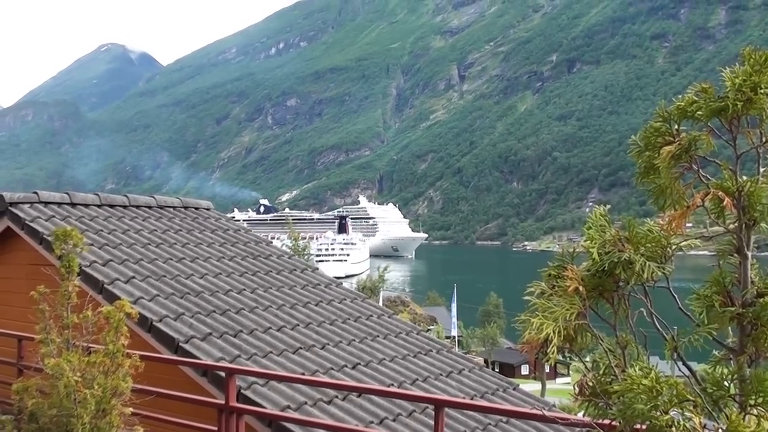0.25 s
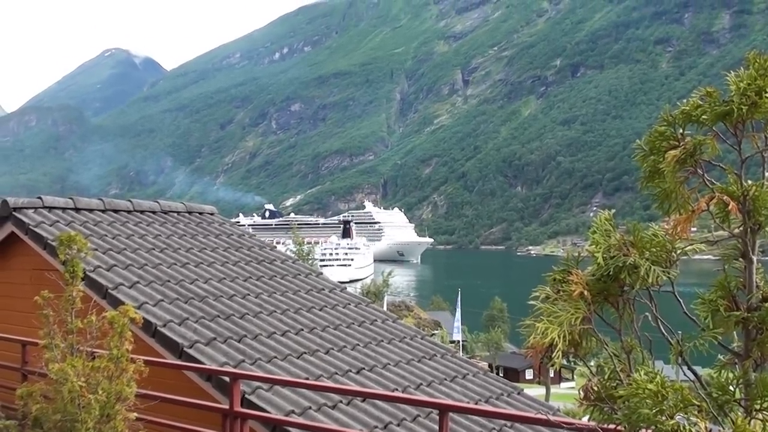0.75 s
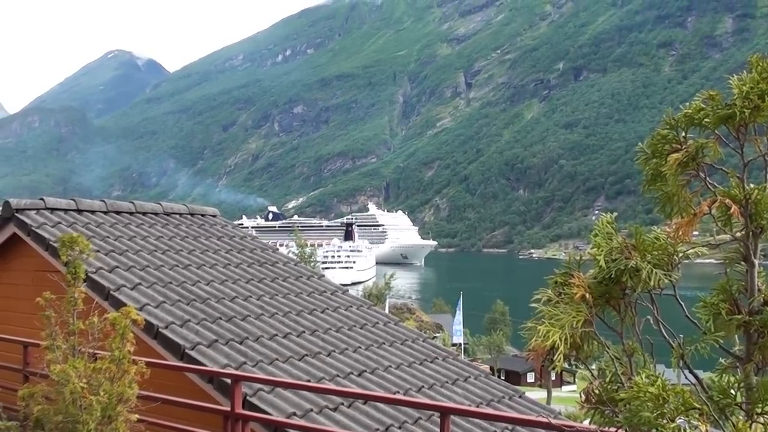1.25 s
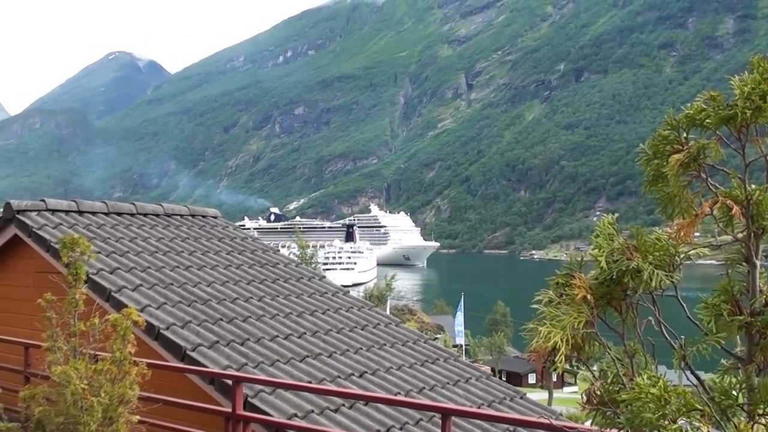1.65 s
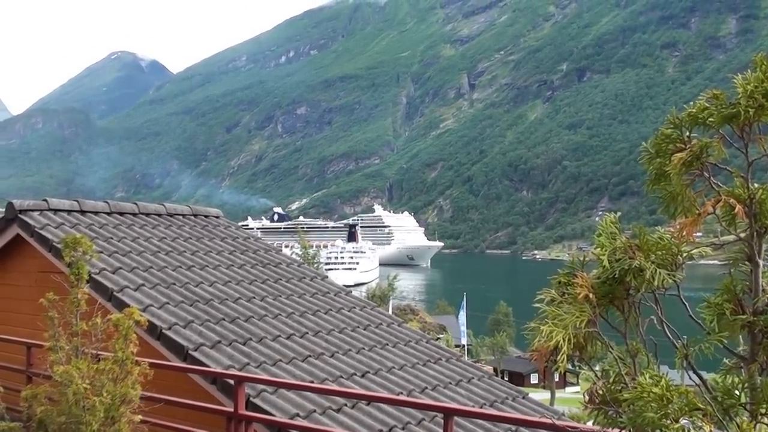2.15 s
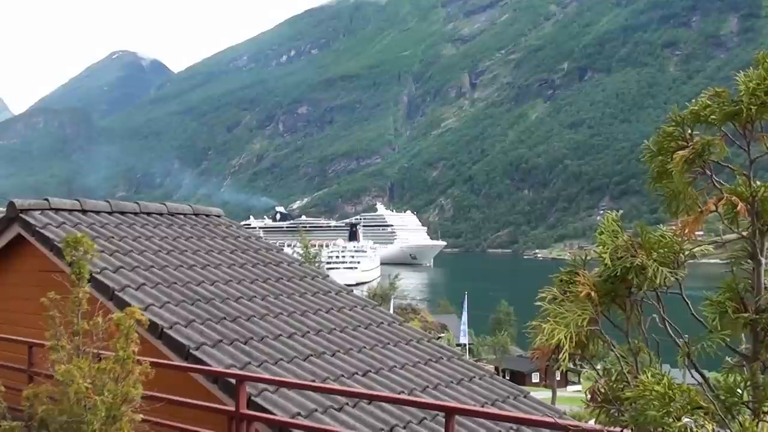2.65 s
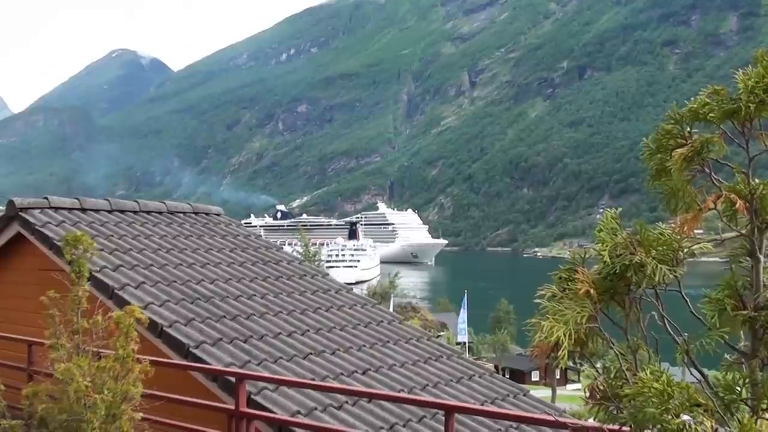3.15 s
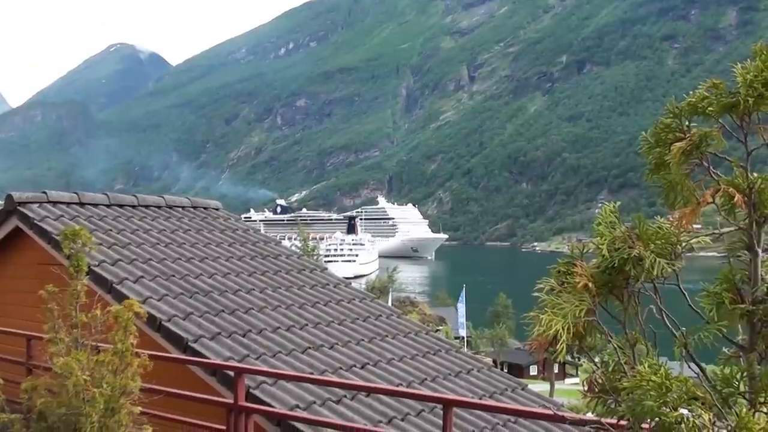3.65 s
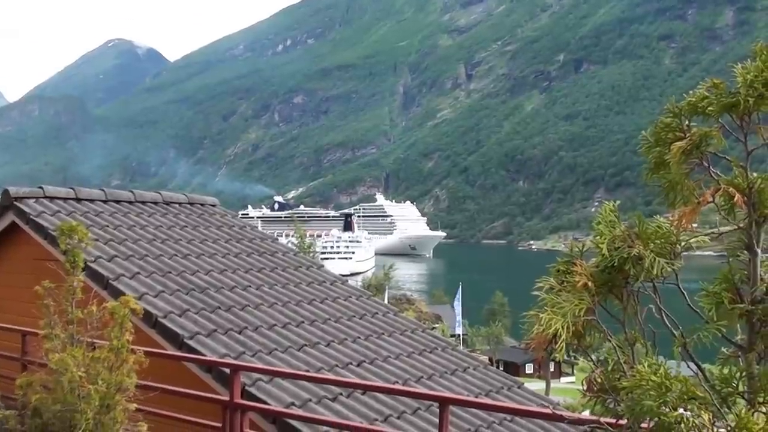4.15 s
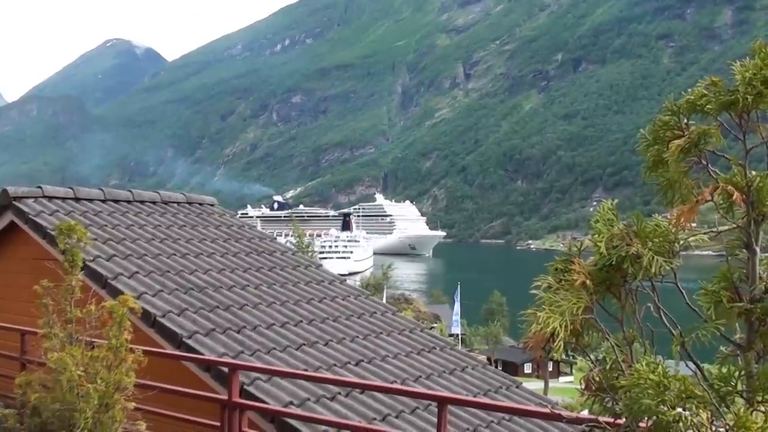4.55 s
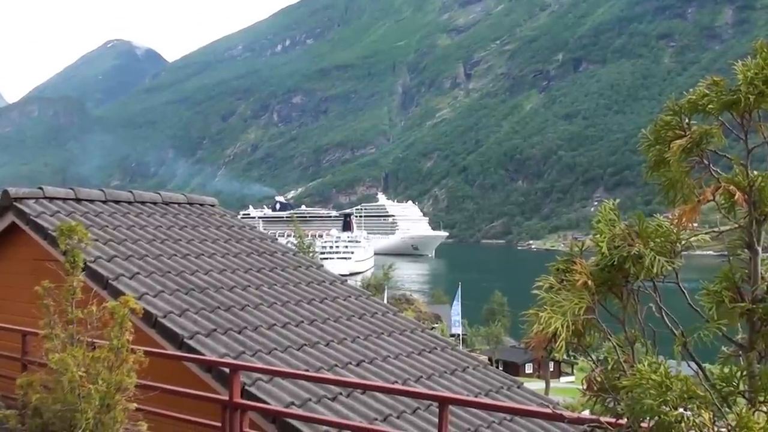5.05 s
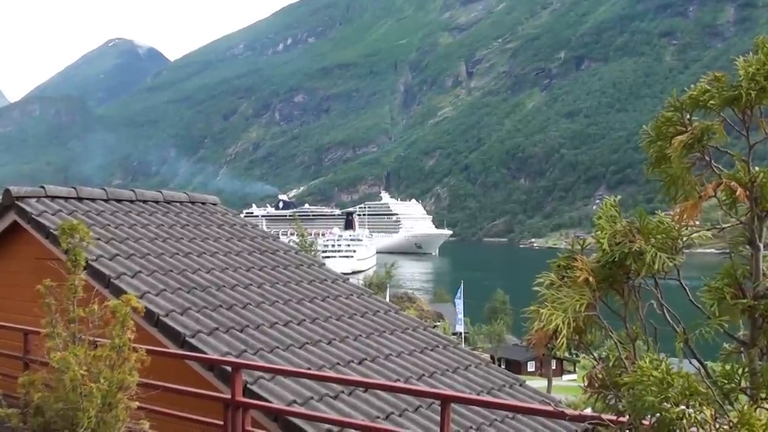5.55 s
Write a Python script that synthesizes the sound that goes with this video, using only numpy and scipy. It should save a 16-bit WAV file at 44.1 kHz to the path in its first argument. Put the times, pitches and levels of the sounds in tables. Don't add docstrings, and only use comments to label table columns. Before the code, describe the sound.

Outdoors above a fjord harbour, a powerful low ship horn drones steadily, its brassy overtones shimmering and fading with the moving air. A fainter horn of nearly the same pitch makes it throb. Just after five seconds the blast drops away with a short downward sag, leaving softer echoes from the slopes and the distant horn. Low generator hum, small bright ticks and camera microphone hiss lie underneath.

```python
import sys
import numpy as np
from scipy import signal
from scipy.fft import rfft, irfft
from scipy.io import wavfile

SR = 44100
rng = np.random.default_rng(int(sys.argv[2]) if len(sys.argv) > 2 else 0)


def generate_wav(sig):
    pcm = np.round(np.clip(np.atleast_2d(sig).T, -1, 1) * 32767).astype(np.int16)
    wavfile.write(sys.argv[1], SR, pcm)


def gain_from_db(level_db):
    decades = np.asarray(level_db, float) / 20
    return 10 ** decades


N = 255780
SHUT_S = 5.105


def in_time(rows):
    s, *columns = np.transpose(rows)
    return [np.interp(np.arange(N) / SR, s, column) for column in columns]


def at_hz(points, hz):
    point_hz, value = np.transpose(points)
    return np.interp(np.log(hz), np.log(point_hz), value)


def since(s):
    return np.maximum(np.arange(N) / SR - s, 0)


def drift(rate_hz):
    r = np.exp(-80 * np.pi * rate_hz / SR)
    noise = rng.standard_normal(N // 40 + 4002)
    slow = signal.lfilter([1], [1, -2 * r, r * r], noise)[4000:]
    slow = slow / np.sqrt(np.mean(slow ** 2))
    return np.interp(np.arange(N) / 40, np.arange(len(slow)), slow)


def partial(cycles, level_db, pan_db=0., lead_rad=0.):
    side = np.array([[.5], [-.5]])
    return np.sqrt(2) * gain_from_db(level_db + pan_db * side) * np.cos(2 * np.pi * cycles + lead_rad * side)


def shimmer(multiple, slow_db, fast_db, wander_cycles):
    depth = np.sqrt(min(multiple, 12) / 6)
    fade_db = depth * (slow_db * drift(1.2) + fast_db * drift(6.2))
    shift = depth * wander_cycles * (drift(0.73) + 0.27 * drift(13.0))
    return fade_db, shift


# f/Hz, density/(dB per Hz)
HARBOUR = [(20, -75), (50, -81), (80, -68), (200, -63.5), (320, -67), (470, -67), (640, -66.5), (900, -73),
           (1500, -76.5), (2300, -83.5), (3500, -92), (5500, -99), (9000, -108), (15000, -116)]
# f/Hz, width/Hz, level/dB
HARBOUR_PEAKS = [(553.5, 19, 10.5), (738, 19, 3.5), (1004, 18, 5)]
# f/Hz, likeness/1
LIKENESS = [(60, 0.61), (300, 0.51), (1400, .9), (3000, 0.89), (4500, .56), (7000, 0.9), (10000, 0.9)]
# f/Hz, rms level/dB
GENERATOR = [(62, -61.5), (68, -61), (75, -59), (86.1, -56), (112.2, -47.5), (162.1, -58.5), (199.7, -54),
             (246.6, -49.5)]


def harbour():
    hz = np.maximum(np.fft.rfftfreq(N, 1 / SR), 10)
    shape_db = at_hz(HARBOUR, hz)
    for centre_hz, width_hz, db in HARBOUR_PEAKS:
        shape_db = shape_db + db / (1 + (2 * (hz - centre_hz) / width_hz) ** 2)
    alike = np.clip(at_hz(LIKENESS, hz), 0, 1)
    mid, side = rfft(rng.standard_normal((2, N))) * gain_from_db(shape_db) * np.sqrt(SR / 2)
    pair = np.sqrt((1 + alike) / 2) * mid + np.sqrt((1 - alike) / 2) * side * [[1], [-1]]
    octave = np.log2(hz / 40)
    noise = 0
    for k in range(-2, 10):
        band = irfft(pair * np.clip(1 - abs(octave - k), 0, 1), N)
        noise = noise + band * gain_from_db(1.3 * drift(1.4) + .9 * drift(7.))
    lines = 0
    for line_hz, db in GENERATOR:
        cycles = line_hz * np.arange(N) / SR + 0.08 * drift(0.39)
        lines = lines + partial(cycles, db + 0.8 * drift(4.4), 5.3)
    return gain_from_db(.7) * (noise * gain_from_db([[.6], [-.6]]) + lines)


# t/s, level/dB, f/Hz, rise/s, t60/s
TICKS = [
    (.524, -57, 4800, .001, 0.021),
    (.525, -50, 7200, .001, 0.013),
    (3.179, -64.5, 7500, .08, .25),
    (5.26, -62, 5600, .02, .1),
    (.077, -57, 5600, .001, .02),
    (.64, -55, 5200, .002, 0.028),
    (1.39, -61.5, 6000, .002, .03),
    (5.412, -48, 7300, .001, 0.018),
    (5.412, -55, 5000, .001, .015),
]


def ticks():
    out, t = np.zeros(N), np.arange(SR // 4) / SR
    for s, level_db, hz, rise_s, t60_s in TICKS:
        band = signal.butter(2, [hz * 0.81, hz * 1.12], "band", fs=SR, output="sos")
        fall_db = 60 * np.maximum(t - rise_s, 0) / t60_s
        shape = np.minimum(t / rise_s, 1) * gain_from_db(level_db + 12.5 - fall_db)
        start = round(s * SR)
        out[start:start + len(t)] += signal.sosfilt(band, rng.standard_normal(len(t))) * shape
    return out


def arrival(s, rise_s, fade_db_per_s):
    return np.minimum(since(s) / rise_s, 1) ** 2 * gain_from_db(-fade_db_per_s * since(s + rise_s))


# t/s, rise/s, fade/(dB per s), fundamental level/dB, octave level/dB
SHORES = [
    (5.12, .1, 58, -29, -28.5),
    (5.419, 0.079, 8.5, -34.5, -28),
]
# multiple/1, level/dB
ECHO_UPPER = [(3, 4.5), (4, -14.5), (5, -14), (6, -11), (7, -17), (8, -18.5), (9, -25), (10, -26),
              (11, -23.5)]


def echo():
    cycles = 134.4 * (np.arange(N) / SR - 5.6) - .2
    out = arrival(5.48, 0.18, 14.5) * partial(cycles, -27.5, -.3)
    for s, rise_s, fade_db_per_s, first_db, second_db in SHORES:
        pair = partial(cycles, first_db, -.3) + partial(2 * cycles + .21, second_db, -.3)
        out = out + arrival(s, rise_s, fade_db_per_s) * pair
    bright = arrival(5.03, 0.035, 18)
    for k, level_db in ECHO_UPPER:
        fade_db, shift = shimmer(k, 1.2, 3.2, .16)
        out = out + bright * partial(k * cycles + 0.89 + shift, -31 + level_db + fade_db, 0.19)
    return out


# t/s, f/Hz
FAR_PITCH = [(0.0, 131.74), (0.8, 132.19), (1.6, 132.17), (2.4, 132.42), (3.2, 132.51), (4.0, 132.42),
             (4.8, 132.46), (5.8, 132.63)]
# t/s, level/dB
FAR_SWELL = [(0, -5.5), (.5, -9.5), (1.1, -4), (1.9, -12), (2.7, -5), (3.5, 1), (4.3, 2.5), (5.4, 3),
             (5.62, -12), (5.72, 6), (5.8, 8)]
# offset/dB, share of swell/1
FAR_FOLLOWS = [
    (-2.5, 0.058),
    (0.1, 1.2),
    (-2, 0.24),
]
# multiple/1, rms level/dB, left-right level/dB, left lead/rad
FAR_OVERTONES = [(1, -33.5, 0.4, -0.87), (2, -32.5, 0.2, 0.97), (3, -44.5, -7, 0.032), (4, -37, -1, -0.65),
                 (5, -37, 1.5, -0.12), (6, -55.5, -2, -0.88), (7, -57.5, 3, 0.036), (8, -60, 3.5, 0.69),
                 (9, -56.5, 0.6, 0.043)]


def far_horn():
    cycles = .44 + np.cumsum(in_time(FAR_PITCH)[0]) / SR
    path_db = in_time(FAR_SWELL)[0]
    swell_db = [offset_db + share * path_db for offset_db, share in FAR_FOLLOWS]
    out = 0
    for k, level_db, pan_db, lead_rad in FAR_OVERTONES:
        fade_db, shift = shimmer(k, 1.1, .8, .03)
        flare = .19 + .65 * max(k - 2.85, 0)
        total_db = level_db + swell_db[min(round(k), 3) - 1] + fade_db
        out = out + partial(k * cycles + flare + shift, total_db, pan_db, lead_rad)
    return out


# t/s, f/Hz
PITCH = [(0.0, 134.49), (0.4, 134.61), (0.8, 134.83), (1.3, 134.85), (1.8, 134.91), (2.4, 134.81),
         (3.0, 134.97), (3.6, 134.77), (4.1, 135.01), (4.6, 134.85), (5.08, 134.98)]


def diaphragm():
    sag_hz = 40 * (1 - np.exp(-since(SHUT_S) / 0.146))
    return np.cumsum(in_time(PITCH)[0] - sag_hz) / SR


# t/s, level/dB, clarity/dB
AIR_PATH = [(0.0, -1.5, -6), (0.25, 1, -1), (1.0, 2.5, -1.5), (1.25, 3, 3), (1.5, 1, 1.5), (1.75, 1.2, 5.5),
            (2.0, 2.2, -4), (2.25, 3.1, -12.5), (2.5, 0.3, 0.5), (2.75, -1, -4), (3.0, 1.7, -5.5),
            (3.3, 1.5, -0.5), (3.75, 2.5, 5), (4.0, 0.5, 3), (4.25, 4.5, -3.5), (4.5, 0.5, 0.4),
            (4.95, 0.5, 0), (5.08, -4, 3)]
# delay/s, sudden drop/dB, time constant/s, fade/(dB per s)
RELEASE = [
    (.035, 13, .02, 23),
    (.002, 19, 0.038, 49),
    (0.00077, 33, 0.033, 77.5),
    (.001, 35, .04, 94),
]


def registers():
    level_db, clarity_db = in_time(AIR_PATH)
    held = [level_db, -0.13 * level_db, 0.092 * clarity_db, clarity_db]
    stall_db = 394 * since(SHUT_S + 0.17)
    out = []
    for db, (lag_s, drop_db, tau_s, fade_db_per_s) in zip(held, RELEASE):
        after = since(SHUT_S + lag_s)
        out.append(db - drop_db * (1 - np.exp(-after / tau_s)) - fade_db_per_s * after - stall_db)
    return out


def air_rasp():
    gate = 0.37 + (.5 + .5 * np.cos(2 * np.pi * diaphragm())) ** 3
    band = signal.butter(2, [1000, 2600], "band", fs=SR, output="sos")
    noise = signal.sosfilt(band, rng.standard_normal(N))
    return gain_from_db(-46 + 0.7 * registers()[3]) * gate * noise * gain_from_db([[1.1], [-1.1]])


# t/s, half-length/s, overtone/1, spread/overtones, level/dB
EDDIES = [(.4, .25, 11.5, 1.3, -3), (.55, .35, 4.9, .9, -4), (.95, 0.12, 3, .6, 4),
          (1.599, .35, 19.5, 1.4, 4.5), (1.85, .2, 3.4, 0.53, 3.5), (2.1, .17, 4, 1, 5),
          (2.199, .3, 17, .8, 6), (2.302, .35, 26, 1.7, 9), (2.548, 0.17, 8.5, 1.8, 5),
          (2.694, .25, 14, .7, 8), (3.098, 0.34, 5, 0.54, -5), (3.6, .25, 20, 1.3, -12.5),
          (3.75, .3, 9, .6, 3.5), (3.947, 0.1, 4, 1.7, 2.5), (4.2, .45, 18.5, 1.1, 3.5),
          (4.974, .17, 10, 0.45, 13), (5.009, .15, 4.96, 1.1, 9), (5.02, .12, 19, 2.5, -8.5)]


def eddies(multiple):
    t, out = np.arange(N) / SR, 0
    for s, half_s, k, spread, db in EDDIES:
        out = out + db * np.exp(-((t - s) / half_s) ** 2 - ((multiple - k) / spread) ** 2)
    return out


# rms level/dB, slide/dB and bend/dB over half the blast
OVERTONES = [(-19.5, 1.5, 1.5), (-13, -1, 0.4), (-29, 6, -16.5), (-27.5, -2.5, 0.7), (-30, -4.5, -12.5),
             (-48.5, 3, -2), (-35.5, 10.1, -11), (-40, 0.2, -9), (-41.5, -2.5, -1.5), (-47, -1, -13),
             (-43.5, -0.2, -7.5), (-51.5, 0.2, 1.8), (-61.5, -0.8, 3.5), (-59.5, 0, 6), (-49, 3.5, -9.5),
             (-56.5, -4.5, -1.5), (-61, -0.5, 7), (-54, 4.5, 2), (-64, -5, 0), (-58.5, -0.1, -3.5),
             (-62.5, 0.3, 3)]
# left-right level/dB, left lead/rad
BEARINGS = [(3, .05), (3.1, -.33), (2.6, .6), (1.8, -.35), (1.4, -.35), (4, -.4), (1.3, .65), (1.4, -.4),
            (1.2, .2), (2.4, -.4), (3.3, -.3), (.7, -.4), (1.7, .3), (-2.5, .1), (2.7, -.1), (.8, 0),
            (4.2, .1), (2.1, -.2), (5.5, -.1), (1.7, -.7), (.4, -.3), (-2.5, -.7), (-4, -.2), (-1, -.3),
            (-3, .3), (2, -.2), (-3, .2), (5.5, .1), (-.5, 0), (3.5, 0)]
# multiple/1, rms level/dB
HALF_LINES = [(1.5, -56), (2.5, -51), (3.5, -43.5), (4.5, -58), (5.5, -62.5), (7.5, -58)]


def near_horn():
    cycles = .15 + diaphragm()
    first_db, second_db, middle_db, high_db = registers()
    slide = np.clip((np.arange(N) / SR - 2.6) / 2.5, -1, 1)
    top = [(-69 - k, -1.5, 0) for k in range(9)]
    out = 0
    rows = zip([*OVERTONES, *top], BEARINGS)
    for k, ((level_db, slide_db, bend_db), (pan_db, lead_rad)) in enumerate(rows, 1):
        group = np.searchsorted([1.5, 2.5, 9.5], k)
        path_db = [first_db, second_db, middle_db, high_db * (k / 17) ** 0.99][group]
        path_db = path_db + slide_db * slide + bend_db * slide ** 2 + eddies(k)
        slow_db, fast_db = [.2, .2, .8, 1.1][group], [.4, .4, 1.1, 1.3][group]
        fade_db, shift = shimmer(k, slow_db, fast_db, [.015, .015, .035, .035][group])
        flare = .5 + .32 * max(k - 2, 0)
        out = out + partial(k * cycles + flare + shift, level_db + path_db + fade_db, pan_db, lead_rad)
    for k, level_db in HALF_LINES:
        fade_db, shift = shimmer(k, 1.8, 1.5, .12)
        out = out + partial(k * cycles + shift, level_db + second_db + fade_db, 0.48)
    return out


def scene():
    return harbour() + ticks() + echo() + far_horn() + air_rasp() + near_horn()


def top_cut(x):
    return signal.sosfilt(signal.butter(12, 15200, fs=SR, output="sos"), x)


def record(dry):
    common, left, right = rng.standard_normal((3, N))
    duck_db = 0.11 * in_time(AIR_PATH)[1]
    recover_db = 2 * np.minimum(since(SHUT_S) / .2, 1)
    hiss = gain_from_db(-60 + 1.2 - duck_db + recover_db) * (common + .12 * np.array([left, right]))
    whine = partial(8393 * np.arange(N) / SR, -79)
    cut = signal.cheby2(16, 60, 14600, fs=SR, output="sos")
    mix = signal.sosfilt(cut, dry + hiss + whine)
    return top_cut(mix)


dry = scene()
out = record(dry)
generate_wav(out)
```